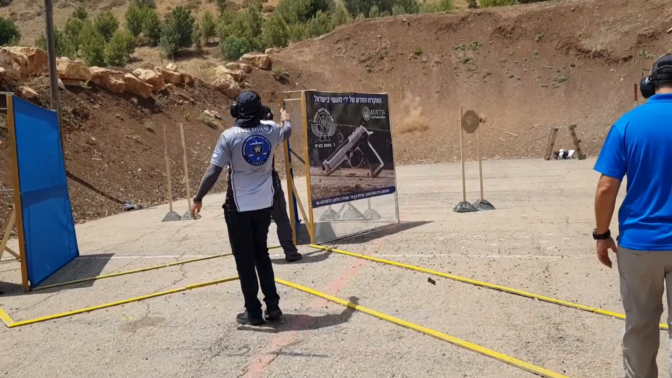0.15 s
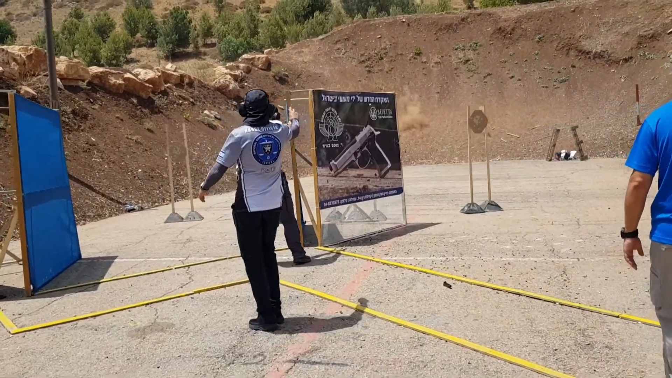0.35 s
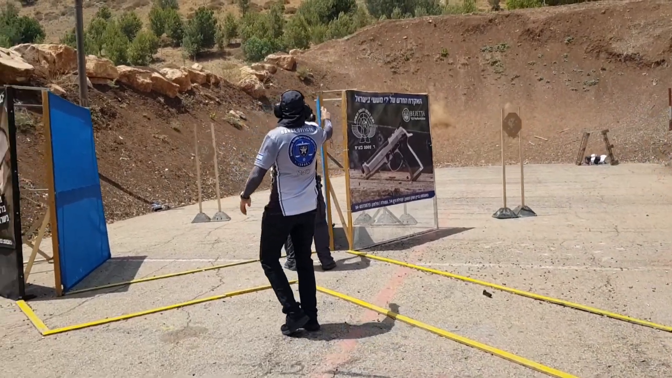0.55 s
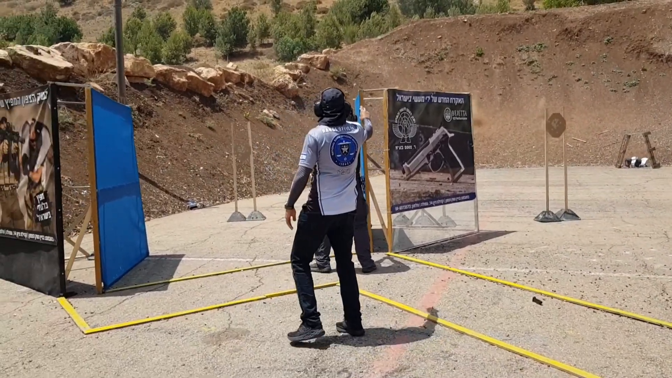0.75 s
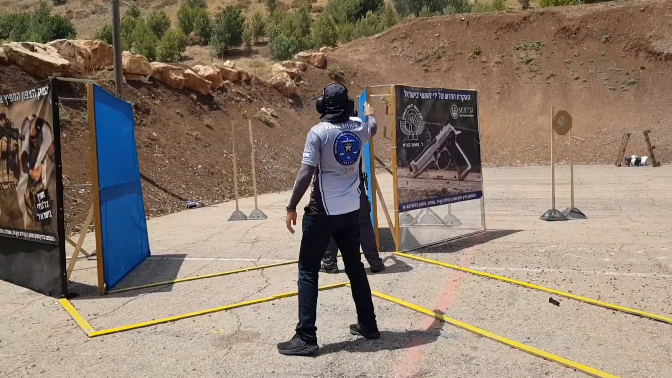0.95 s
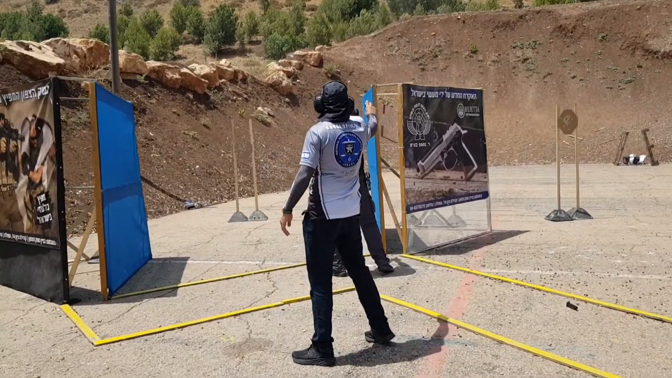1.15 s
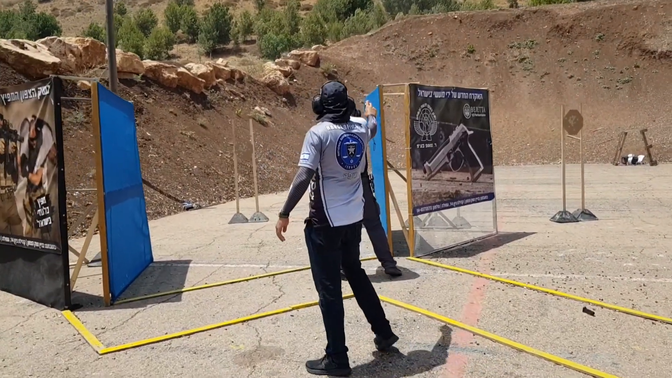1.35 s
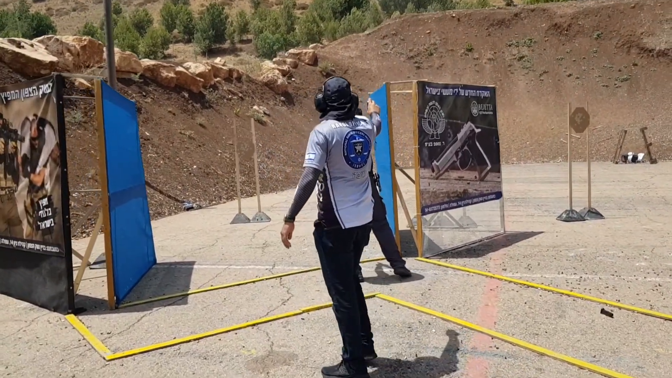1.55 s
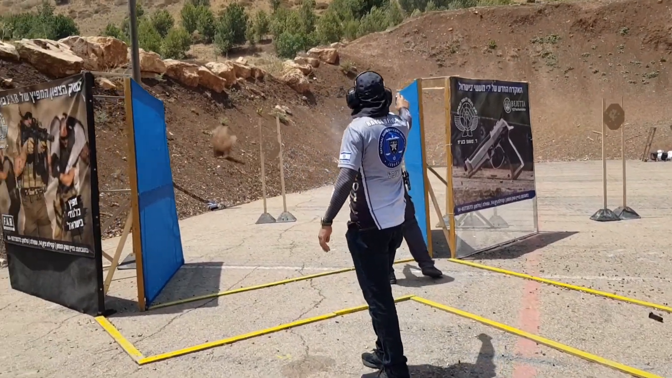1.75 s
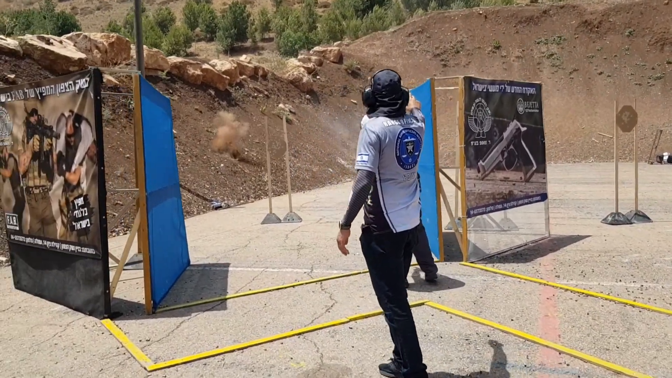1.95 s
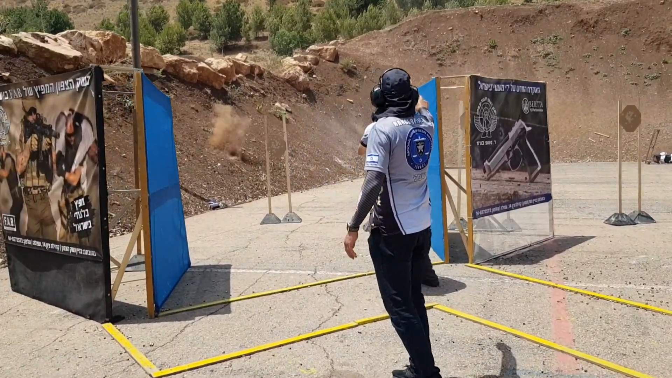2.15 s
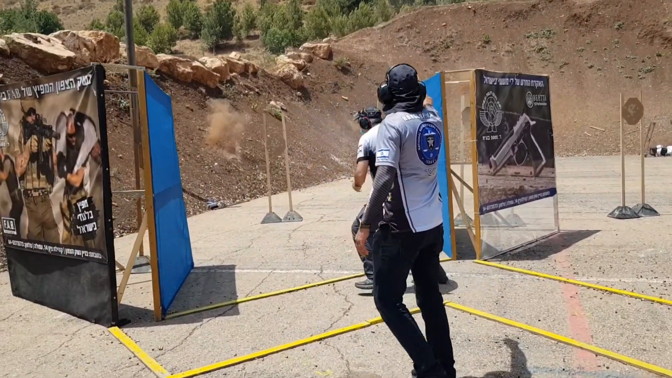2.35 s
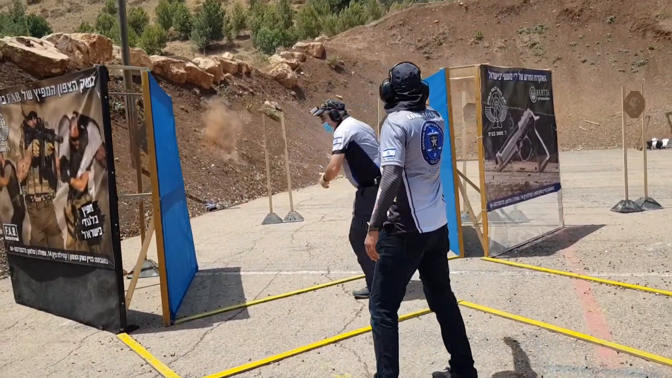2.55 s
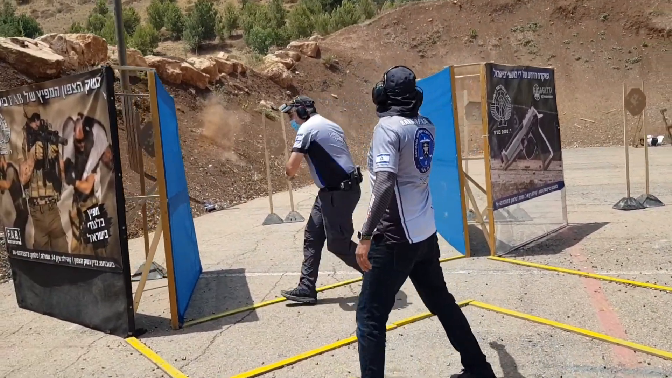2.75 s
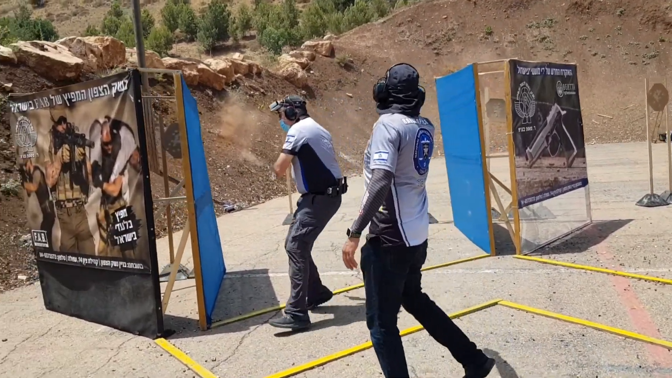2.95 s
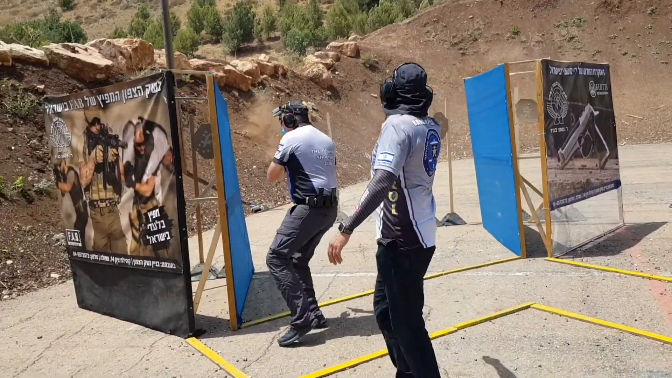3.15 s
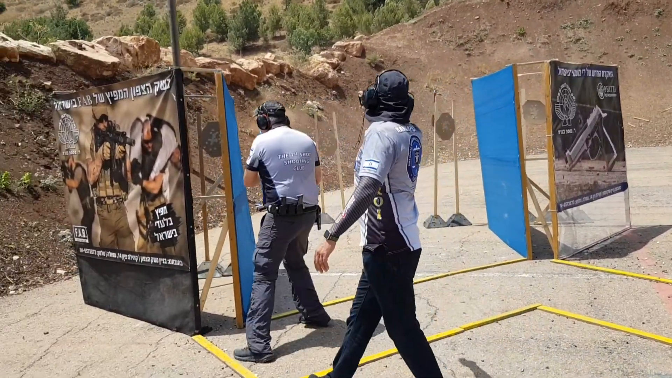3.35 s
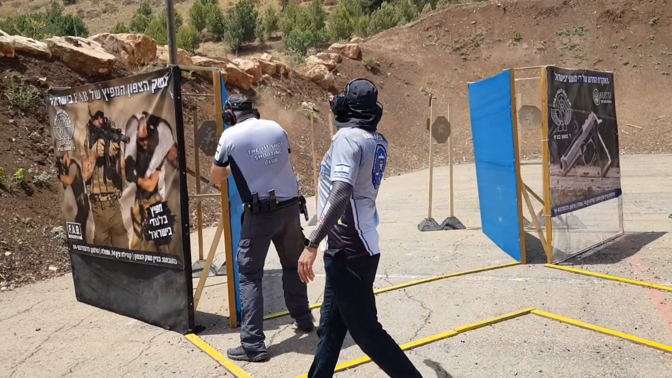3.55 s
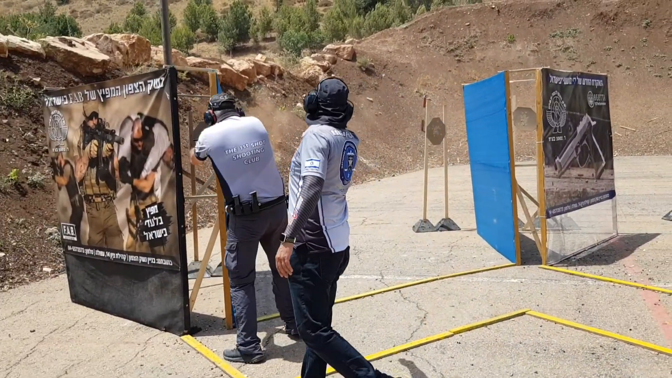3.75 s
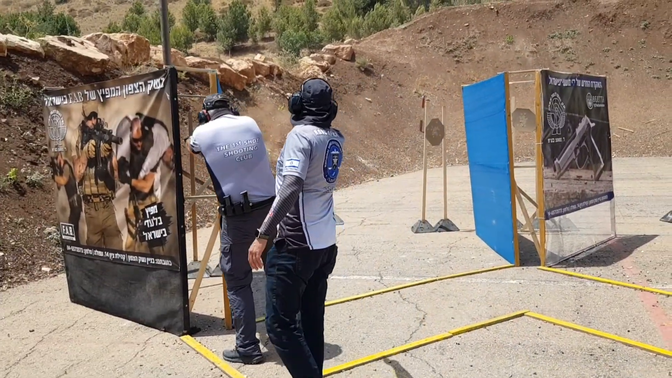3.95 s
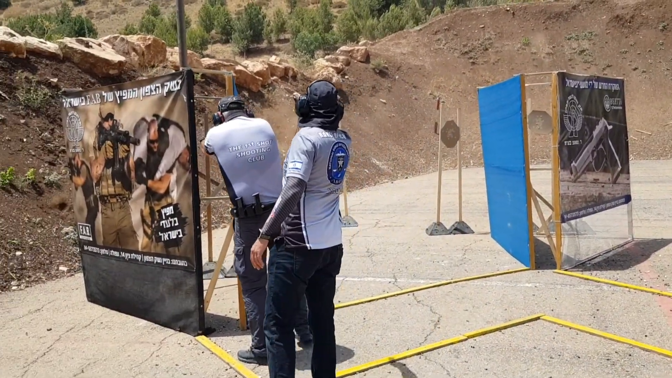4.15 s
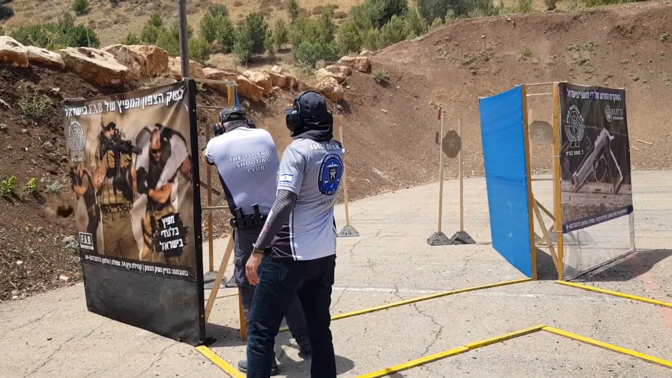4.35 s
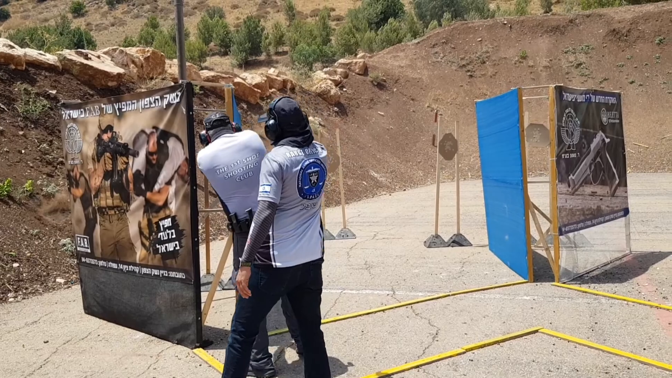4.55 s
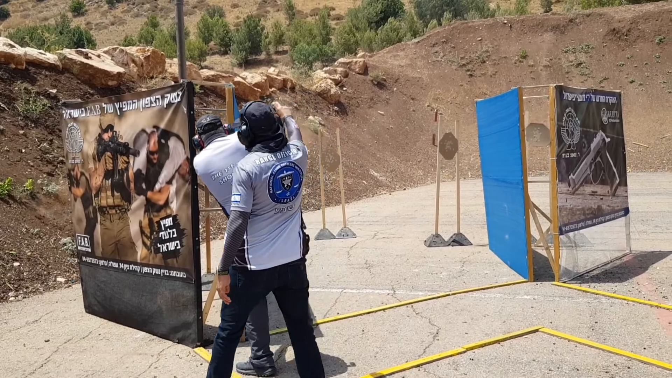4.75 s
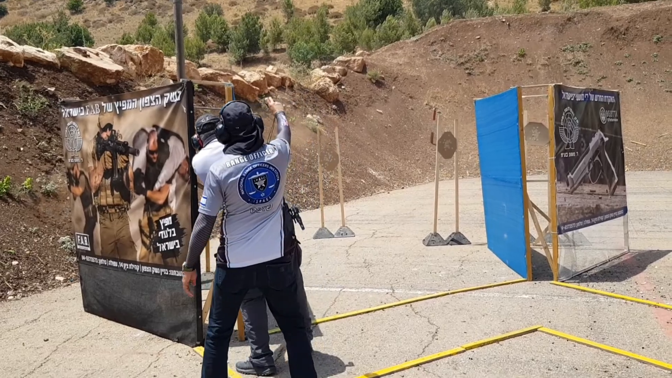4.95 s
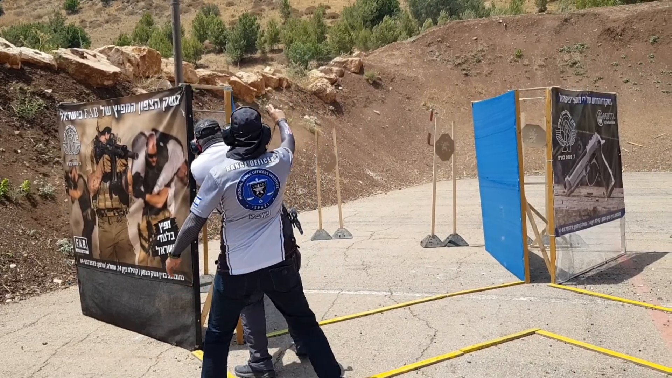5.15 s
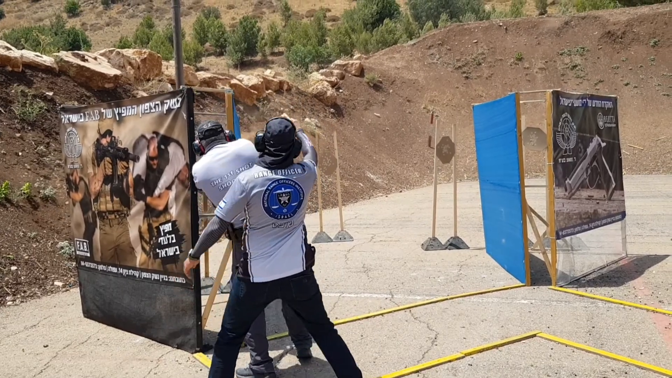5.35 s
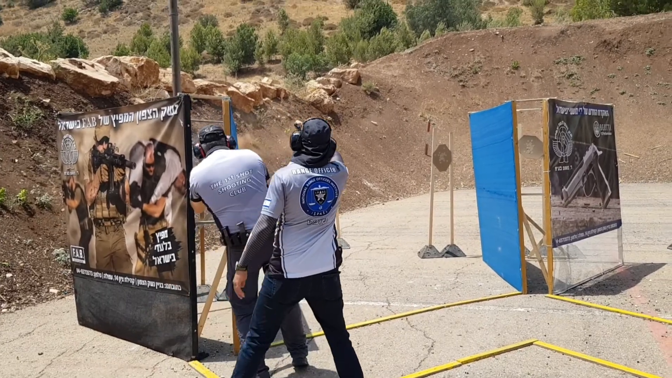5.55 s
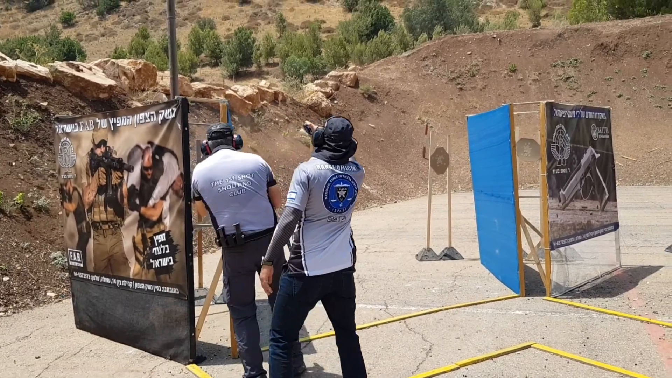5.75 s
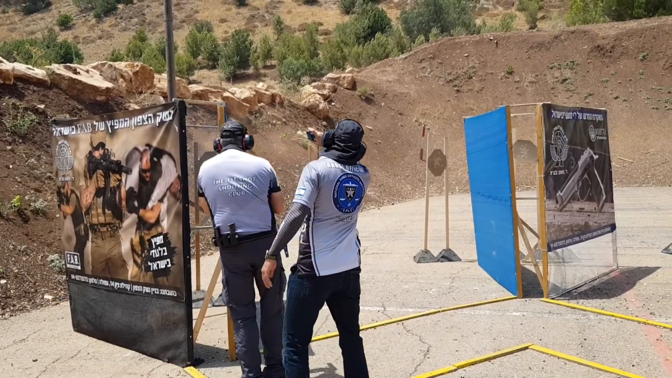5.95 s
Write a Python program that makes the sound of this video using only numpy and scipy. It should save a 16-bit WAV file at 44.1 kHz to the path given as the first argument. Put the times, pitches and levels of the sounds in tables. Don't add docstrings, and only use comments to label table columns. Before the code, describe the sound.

An outdoor pistol range with earth banks, heard from a few metres on a phone whose right port is open and bright and whose left is covered, dull and weak. Echoes of an earlier shot are still fading at the start. Quick pairs crack at about 0.14 and 0.34, 1.03 and 1.25, then 1.73 and 1.94 seconds. Each has a low thump, crackling scatter from nearby screens, a berm slap about 0.2 seconds later and a faint hill tail. From roughly 2.4 to 4.1 the firing pauses: brass cases tick, ring thinly and roll on asphalt, belt gear knocks dully, shoes scuff, over soft murmur, rustle and faint distant vehicle rumble. Pairs resume at 4.15 and 4.36, the first especially sharp, then 4.84 and 5.06. Echoes die as a hard case click lands near 5.26, more brass bounces, and footsteps pat around 5.76 and 5.92. Limiting flattens the blasts.

```python
import sys
import numpy as np
from scipy import signal
from scipy.fft import rfft, irfft
from scipy.io import wavfile
from scipy.ndimage import uniform_filter1d, minimum_filter1d

SR = 44100
rng = np.random.default_rng(int(sys.argv[2]) if len(sys.argv) > 2 else 0)


def magnitude_from_level(level_db):
    exponent = np.asarray(level_db, float) / 20
    return 10 ** exponent


def materialize(psi):
    bounded = np.clip(np.atleast_2d(psi).T, -1, 1)
    quanta = np.round(bounded * 32767).astype(np.int16)
    wavfile.write(sys.argv[1], SR, quanta)


N = 264600
TIME = np.arange(N) / SR


def colour(x, points):
    hz, db = np.transpose(points)
    size = 4096
    bin_hz = np.arange(size // 2 + 1) * SR / size
    log_gain = np.interp(np.log(bin_hz + 1), np.log(hz), db) * np.log(10) / 20
    cepstrum = irfft(log_gain)
    cepstrum[1:size // 2] *= 2
    cepstrum[size // 2 + 1:] = 0
    impulse = irfft(np.exp(rfft(cepstrum)))
    return signal.fftconvolve(x, impulse)[:len(x)]


def unit(x):
    return x / np.sqrt(np.mean(x ** 2))


def band(x, lo_hz, hi_hz):
    sos = signal.butter(2, [lo_hz, min(hi_hz, SR / 2.1)], "band", fs=SR, output="sos")
    return signal.sosfilt(sos, x)


def split(x, edges_hz):
    lows = [signal.sosfiltfilt(signal.butter(4, hz, fs=SR, output="sos"), x) for hz in edges_hz]
    return np.diff([0 * x] + lows, axis=0)


def walk(rate_hz):
    hold = int(SR / rate_hz)
    levels = np.repeat(rng.standard_normal(N // hold + 1), hold)
    return unit(uniform_filter1d(levels, hold)[:N])


def fade(start_s, rise_s, t60_s):
    age = np.maximum(TIME - start_s, 0)
    return (1 - np.exp(-(age / max(rise_s, 1e-4)) ** 2)) * magnitude_from_level(-60 * age / t60_s)


def add(out, start_s, sound):
    i = int(start_s * SR)
    if 0 <= i < N:
        out[i:i + len(sound)] += sound[:N - i]


def ring(hz, t60_s, length_s):
    t = np.arange(int(length_s * SR)) / SR
    return np.sin(2 * np.pi * hz * t) * magnitude_from_level(-60 * t / t60_s)


def flaring(x, lo_hz, hi_hz):
    parts = split(x, np.geomspace(lo_hz, hi_hz, num=7))
    return unit(sum(part * magnitude_from_level(2.8 * walk(12)) for part in parts))


# Hz, dB per Hz.
FLOOR = [(18, -56.5), (30, -26.5), (79, -20), (210, -25), (295, -1), (616, 4), (1010, -10), (3580, -21),
         (5310, -20.5), (6720, -22.5), (8300, -35.5), (10800, -29), (16000, -50.5)]
# Hz, dB.
FLOOR_MUFFLE = [(60, -8), (120, -7), (200, -12), (300, -22), (450, -26), (1800, -26), (3500, -28),
                (5000, -37), (12000, -30)]
# Hz, dB.
GROUND_COMB = [(330, -3.5), (500, -1.5), (740, 0.5), (950, 3.5), (1170, 4.5), (1440, -5), (1850, 0),
               (2300, -0.5)]
# time in seconds, dB.
STIR = [(0.78, 3), (0.97, 4.5), (1.62, 6.5), (1.7, 0), (2.4, 2), (2.52, 3), (2.67, -1.5), (2.85, 3.5),
        (3.1, -1), (3.2, -2), (3.4, -3.5), (3.64, -9), (3.86, -3.5), (4.08, -11.5), (4.76, -2), (5.5, 3.5),
        (5.85, 0.5), (6.0, 2)]
MURMUR_DB, RUSTLE_DB, GRIT_DB = -66, -66.5, -73.5
MURMUR_FOLLOWS, RUSTLE_FOLLOWS, GRIT_FOLLOWS = 0.44, 1.1, 1
TRAFFIC_DB, SWELL_DB, SWELL_S, SWELL_WIDTH_S = -90, 12, 4.05, 0.97
PORT_WANDER_DB = 0.5


def air():
    stir_db = np.interp(TIME, *np.transpose(STIR))
    rumble_db = TRAFFIC_DB + SWELL_DB * np.exp(-((TIME - SWELL_S) / SWELL_WIDTH_S) ** 2)
    murmur_db = MURMUR_DB + MURMUR_FOLLOWS * stir_db + 9.5
    rustle_db = RUSTLE_DB + RUSTLE_FOLLOWS * stir_db + 5.5
    grit_db = GRIT_DB + GRIT_FOLLOWS * stir_db + 11.5
    ports = []
    for wander_db in (PORT_WANDER_DB * walk(8), 0):
        noise = colour(colour(rng.standard_normal(N), FLOOR), GROUND_COMB)
        rumble, drone, low, mid, hiss = split(noise, [140, 270, 1250, 2700, 18000])
        mix = unit(band(rumble, 58, 140)) * magnitude_from_level(rumble_db + 5 + 2.0 * walk(4.4))
        mix += unit(drone) * magnitude_from_level(-80 + 2.0 * walk(7))
        mix += flaring(low, 350, 2200) * magnitude_from_level(murmur_db + wander_db)
        mix += flaring(mid, 1300, 3800) * magnitude_from_level(rustle_db + 0.84 * walk(44))
        mix += unit(hiss) * magnitude_from_level(grit_db + 0.51 * walk(25) + 2.0 * walk(640))
        ports.append(mix)
    return np.array([colour(ports[0], FLOOR_MUFFLE), ports[1]])


# Hz, dB per Hz.
BLAST = [(60, -25.5), (200, -20), (300, -10.5), (450, -7), (620, -1), (900, -4), (1300, -4), (2400, -7.5),
         (3300, -14), (5000, -12.5), (7000, -10.5), (12000, -7.5), (15500, -14.5), (17000, -40)]


def patchy(patch_db, crackle_db):
    flicker_db = crackle_db * walk(900) + 1.2 * walk(170)
    crackle = colour(rng.standard_normal(N) * magnitude_from_level(flicker_db), BLAST)
    parts = split(crackle, np.geomspace(400, 20000, num=12))
    return unit(sum(part * magnitude_from_level(patch_db * walk(60)) for part in parts))


# start in seconds, scatter dB, boom dB, brightness dB.
SHOTS = [
    (0.142, -0.5, -2.5, 0),
    (0.335, 0, 1, 1.5),
    (1.027, -4.5, 4.5, 2),
    (1.245, -6, 6, 4),
    (1.728, -2.5, 4, 1.7),
    (1.943, -3.5, 4.5, 1.6),
    (4.147, -3, -0.5, 1.2),
    (4.362, -5, 1, 2.5),
    (4.836, -3.5, -1, -0.5),
    (5.06, -4, -1.5, 0.7),
]
EARLIER_SHOT = (-.133, -3, -1, 1)
# open port build-up in ms, berm dB, open port lateness in ms.
PATHS = [(6, 0.5, 12.5), (7.4, 0.5, 4), (22, -3.5, -1.5), (11.4, 3, 2), (6.3, -3, 4), (6.9, 2, 2.5),
         (17.7, -2.5, 0.5), (32.4, -1.5, 0.5), (24, -7, -1.5), (18.4, -2.5, 2), (13, -5, 3.5)]
# top Hz, near t60 in seconds, berm dB, berm t60 in seconds, hills dB,
# hills t60 in seconds.
BAY = [(336, 0.22, -28, 0.58, -56, 5.1), (940, 0.27, -32, 0.58, -58, 0.86),
       (3000, 0.26, -28, 0.51, -62, 1.8), (7540, 0.3, -22.5, 0.44, -63, 1.4),
       (20000, 0.27, -27, 0.37, -59, 1.1)]
ALL_SHOTS = [EARLIER_SHOT] + list(SHOTS)
BERM_S, BERM_BUILD_S = .202, .017


def scatter(build_up, gain_db, early_db, linger):
    noises = split(patchy(patch_db=3, crackle_db=2.5), [row[0] for row in BAY])
    out = 0
    for k, (noise, row) in enumerate(zip(noises, BAY)):
        _, near_t60, berm_db, berm_t60, hills_db, hills_t60 = row
        power = 0
        for (s, scatter_db, boom_db, bright_db), (rise_ms, face_db, late_ms) in zip(ALL_SHOTS, PATHS):
            near = fade(s + build_up * late_ms / 1000, build_up * rise_ms / 1000, near_t60 * linger)
            early_s = s + (build_up - .3) * late_ms / 1500 + 0.00086
            early = magnitude_from_level(early_db) * fade(early_s, 0.0013, 0.11)
            berm = magnitude_from_level(berm_db + face_db) * fade(s + BERM_S, BERM_BUILD_S, berm_t60)
            hills = magnitude_from_level(hills_db) * fade(s + 0.13, 0.15, hills_t60)
            tone_db = (boom_db, boom_db, 0, bright_db, bright_db - 8)[k]
            shape = near ** 2 + early ** 2 + berm ** 2 + hills ** 2
            power = power + shape * magnitude_from_level(scatter_db + tone_db) ** 2
        out = out + np.sqrt(power) * noise
    return magnitude_from_level(gain_db) * out


# delay in seconds, dB.
BERM = [(.033, 5), (.062, -7), (.098, -15), (0.2026, -8.5), (.219, -11.5), (0.228, -23), (0.2376, -8.5),
        (0.245, -14)]


def slaps():
    front = np.zeros(N)
    chance = rng.standard_normal((len(PATHS), len(BERM), 2))
    for shot, (_, face_db, _), draws in zip(ALL_SHOTS, PATHS, chance):
        for (delay_s, db), (late_ms, size) in zip(BERM, draws):
            rough = rng.standard_normal(150) * np.exp(-np.arange(150) / 18)
            boom = .19 * ring(400 + 60 * late_ms, .035, .009)
            gain = magnitude_from_level(db + face_db + 2 * size)
            start_s = shot[0] + delay_s + .001 * late_ms
            add(front, start_s, gain * rough)
            add(front, start_s, gain * boom)
    return magnitude_from_level(5) * band(colour(front, BLAST), 200, 7000)


# blast dB, ring Hz, screen echo in ms, echo dB.
COVERED = [(-9, 640, 3, -7), (-8, 640, 14, -15), (-10, 600, 15, -12), (-8, 650, 16, -11),
           (-12, 580, 23, -10), (-8, 600, 25, -9), (-24, 700, 10, 0), (-12, 500, 10, 1), (-15, 500, 10, 1),
           (-12, 500, 10, 1)]


def muffled_blasts():
    out = np.zeros(N)
    t = np.arange(int(.012 * SR)) / SR
    for shot, (db, hz, echo_ms, echo_db) in zip(SHOTS, COVERED):
        cavity = 1.25 * np.tanh(2.5 * ring(hz, .03, .012)) * np.exp(-(t / .0048) ** 4)
        crack = band(rng.standard_normal(len(t)), 1200, 4500) * magnitude_from_level(-60 * t / .018) * magnitude_from_level(1)
        for bounce, loss_db in enumerate((0, echo_db, echo_db - 8)):
            start_s = shot[0] + 0.00105 + bounce * echo_ms / 1000
            add(out, start_s, magnitude_from_level(db + loss_db) * (cavity + crack))
    return band(out, 220, 9000)


# start in seconds, dB, Hz.
CRACKS = [(0.143, -14, 4970), (0.335, -7, 2500), (4.1457, 9, 4160), (4.1491, 4, 4220), (4.155, 4, 4160),
          (4.159, 6.5, 3970), (4.163, 7.5, 3980), (4.165, 5, 4400), (4.375, -4.5, 2430),
          (.536, -12.5, 2500), (1.732, -5.5, 3500), (1.931, -16.5, 2500), (2.147, -15, 2570),
          (4.842, -6, 3460), (4.349, -19.5, 4200), (4.566, -18, 4200), (5.039, -18.5, 3870),
          (5.058, -13.5, 3000), (5.263, -12, 3900)]


def cracks():
    out = np.zeros(N)
    for s, db, hz in CRACKS:
        draw = rng.standard_normal(200)
        body = band(band(draw, hz * .8, hz * 1.2), hz * .8, hz * 1.2)
        burst = unit(body) + .7 * unit(band(draw, 10500, 15500))
        shape = np.hanning(len(draw)) ** .5 * np.exp(-np.arange(len(draw)) / 120)
        add(out, s, magnitude_from_level(db - 13.5) * burst * shape)
    return out


# start in seconds, peak dB, Hz.
THUMPS = [(0.144, -36, 83.5), (0.342, -41, 56), (1.029, -40.5, 61), (1.248, -41.5, 81), (1.731, -45.5, 92),
          (1.965, -27.5, 54.7), (4.147, -28, 61.8), (4.366, -29, 63.6), (4.842, -53.5, 97),
          (5.064, -36.5, 54.4)]
THUMP_RISE_S = .01


def thumps():
    out = np.zeros(N)
    swell = 1 - np.exp(-np.arange(int(.3 * SR)) / SR / THUMP_RISE_S)
    for s, db, hz in THUMPS:
        swing = ring(hz, 0.09, .3) + 0.64 * ring(hz * 1.7, 0.06, .3)
        add(out, s, magnitude_from_level(db + 20.5) * swell * swing)
    return out


# start in seconds, low tick dB, ring dB, ring Hz, wide click dB.
CASES = [(0.9423, -59, -39, 10100, -58), (0.9757, -58, -51, 10200, -59), (2.4673, -60, -50, 10300, -69),
         (2.597, -55.5, -44, 10400, -57), (2.834, -61, -36.5, 10160, -57), (2.8703, -54, -62, 10500, -63),
         (3.315, -56.5, -73, 10300, -71), (3.6507, -61, -43.5, 10400, -80), (4.002, -65, -61, 10650, -86),
         (5.2622, -54, -40, 10800, -45.5), (5.458, -63, -49, 9700, -58), (5.6027, -95, -56, 10000, -73.5),
         (5.8964, -74, -62, 10200, -69), (5.979, -54, -50, 10000, -53), (5.99, -53, -62, 10300, -62)]
# start in seconds, low tick dB, ring dB.
MORE_CASES = [(2.6626, -60, -69), (2.9137, -71, -49), (3.1368, -52, -75), (3.3847, -52, -74),
              (3.4221, -74, -74), (3.5162, -57.5, -69), (3.5567, -63, -56), (3.6084, -76, -61.5),
              (3.7848, -53, -61), (3.8487, -50.5, -76), (3.92, -64.5, -80.5), (3.9749, -68, -89),
              (4.029, -69, -67), (4.0894, -67, -82), (5.7059, -71, -72), (5.814, -75, -58)]
MORE_CASES_HZ, MORE_CASES_CLICK_DB = 10380, -16
# start in seconds, length in seconds, dB, Hz.
ROLLS = [(0.892, 0.1, -74, 10380), (0.95, .07, -61, 10980), (1.565, 0.12, -72.5, 10150),
         (4.672, 0.13, -71.5, 11600), (1.65, .05, -63, 10980), (2.463, 0.081, -69, 10330),
         (2.578, 0.18, -73, 10330), (2.826, 0.19, -65, 10330), (3.12, 0.22, -70, 10330),
         (3.31, 0.21, -73, 10980), (3.48, 0.27, -62, 10980), (3.64, .2, -68, 10450),
         (3.802, 0.19, -75.5, 10380), (3.98, 0.13, -65, 10450), (5.587, .2, -74, 10380),
         (5.8, .13, -75, 10380), (5.96, .08, -73, 10380)]
ROLL_RISE, ROLL_FLICKER_DB = .2, -5.5


def cases():
    out = np.zeros(N)
    more = [(s, tick, db, MORE_CASES_HZ, tick + MORE_CASES_CLICK_DB) for s, tick, db in MORE_CASES]
    for s, tick_db, ring_db, hz, click_db in list(CASES) + more:
        draw = rng.standard_normal(200)
        lie = 1 + .015 * draw[:3]
        tick = ring(5250 * lie[0], .02, .05)
        tick += .8 * ring(5800 * lie[1], .012, .05)
        tick += .6 * ring(6300 * lie[2], .008, .05)
        click = band(draw, 4200, 11700) * np.exp(-np.arange(len(draw)) / 40)
        add(out, s, magnitude_from_level(tick_db + 11) * band(tick, 4700, 6800))
        add(out, s, magnitude_from_level(ring_db + 3) * (ring(hz, 0.025, .2) + 0.11 * ring(hz, .15, .2)))
        add(out, s, magnitude_from_level(click_db + 22.5) * click)
    wobble = magnitude_from_level(ROLL_FLICKER_DB * walk(30))
    grit = rng.standard_normal(N)
    for s, length_s, db, hz in ROLLS:
        shape = np.interp(TIME, s + length_s * np.array([0, ROLL_RISE, 1]), [0, 1, 0]) ** .5
        singing = unit(band(band(grit, hz - 50, hz + 50), hz - 80, hz + 80))
        out += magnitude_from_level(db + 4) * shape * wobble * singing
    return out


# start in seconds, dB, low Hz, high Hz.
CLINKS = [
    (2.41, -54, 1500, 2400),
    (3.175, -50, 1500, 2210),
    (3.365, -54, 1590, 1790),
    (3.82, -54.5, 1780, 2350),
    (4.07, -67, 1200, 3300),
]
CLINK_T60_S = .09


def clinks():
    out = np.zeros(N)
    for s, db, low_hz, high_hz in CLINKS:
        modes = ring(low_hz, CLINK_T60_S, .15) + ring(high_hz, CLINK_T60_S * .7, .15)
        add(out, s, magnitude_from_level(db) * modes)
    return out


# start in seconds, end in seconds, Hz, dB.
WHINES = [
    (3.4, 3.72, 1730, -76),
    (2.5, 2.8, 1790, -76),
    (3.55, 3.67, 5150, -68),
]


def whines():
    out = np.zeros(N)
    for start_s, end_s, hz, db in WHINES:
        length = int((end_s - start_s) * SR)
        tone = unit(band(rng.standard_normal(N), hz - 20, hz + 20))[-length:]
        add(out, start_s, magnitude_from_level(db) * np.hanning(length) ** .5 * tone)
    return out


# start in seconds, peak dB, Hz, left minus right dB.
STEPS = [
    (2.88, -59, 270, -15),
    (2.969, -46, 665, -29),
    (4.074, -47.5, 450, -30),
    (3.179, -57, 473, -30),
    (3.378, -51.5, 760, -26),
    (3.58, -50.5, 535, -21.5),
    (3.82, -45, 500, -28),
    (5.915, -48, 700, -27),
    (5.756, -45, 630, -23),
]


def steps():
    out = np.zeros((2, N))
    for s, db, hz, pan_db in STEPS:
        grit = unit(band(rng.standard_normal(N), hz * 0.6, hz * 1.7))
        pat = grit * fade(s, 0.003, 0.14) * magnitude_from_level(db - 3)
        out += pat * magnitude_from_level(np.array([[pan_db], [0]]))
    return out


# Hz, dB.
MUFFLE = [(60, -14), (120, -8), (300, -22), (650, -22), (900, -19), (1500, -23), (3500, -24), (5000, -35),
          (6500, -41), (8000, -43), (10000, -38), (15000, -38)]


def scene():
    knocks, thump, thin = slaps(), thumps(), whines()
    right = scatter(build_up=1, gain_db=6.0, early_db=-22.5, linger=0.99)
    right = right + knocks + cracks() + thump + cases() + clinks() + thin
    left = scatter(build_up=0.2, gain_db=3, early_db=4.5, linger=1.14) + magnitude_from_level(0.5) * knocks
    left = colour(left, MUFFLE) + muffled_blasts()
    left += magnitude_from_level(-20) * thump + magnitude_from_level(-12) * band(thin, 500, 2500)
    return np.array([left, right]) + air() + steps()


def band_limit(x):
    return signal.sosfilt(signal.butter(12, 16620, fs=SR, output="sos"), x)


# Hz, dB.
PORT_NOTCH = [(6900, 0), (7950, -15), (8800, -8), (11500, 0)]


def record(dry):
    dry = np.array([colour(port, PORT_NOTCH) for port in dry])
    hold = int(.009 * SR)
    peak = -minimum_filter1d(-np.abs(dry), hold, axis=1)
    gain = uniform_filter1d(np.minimum(1, 0.96 / (peak + 1e-9)), hold, axis=1)
    top = signal.ellip(8, .2, 34, 15700, fs=SR, output="sos")
    mix = np.clip(signal.sosfilt(top, dry * gain), -1, 1)
    return band_limit(mix)


dry = scene()
out = record(dry)
materialize(out)
```